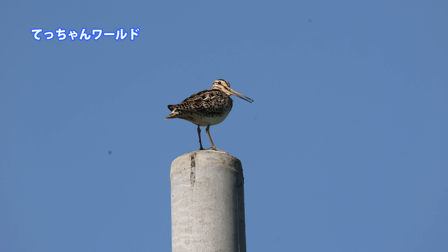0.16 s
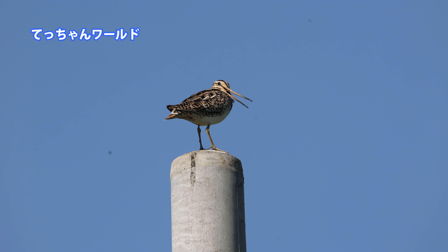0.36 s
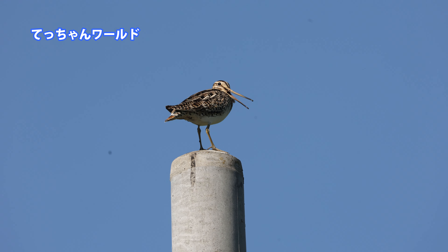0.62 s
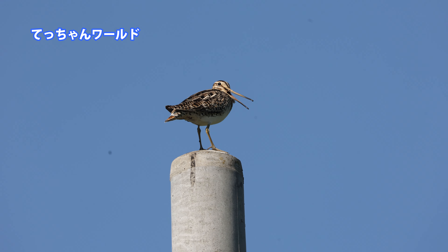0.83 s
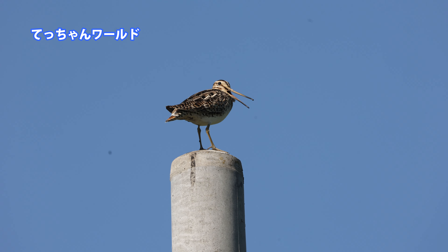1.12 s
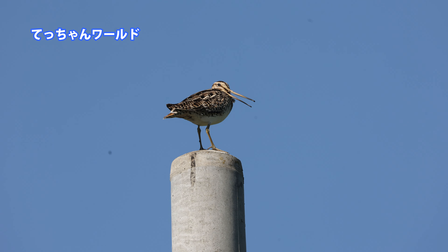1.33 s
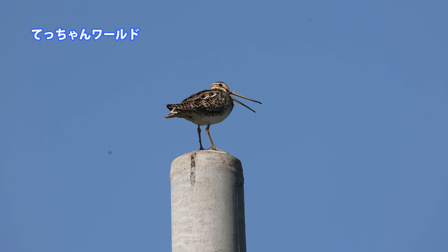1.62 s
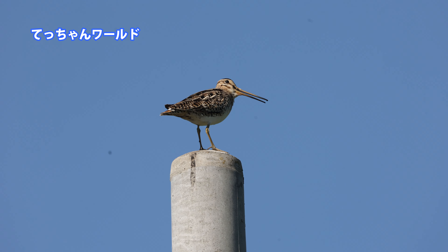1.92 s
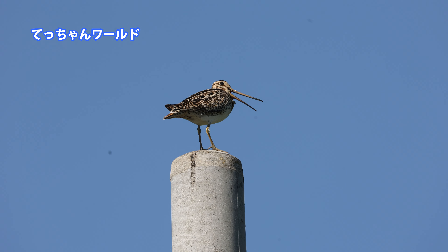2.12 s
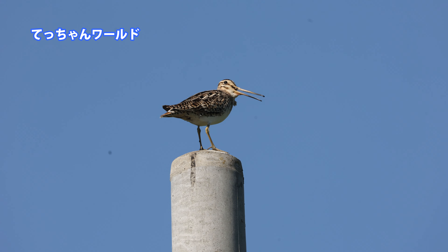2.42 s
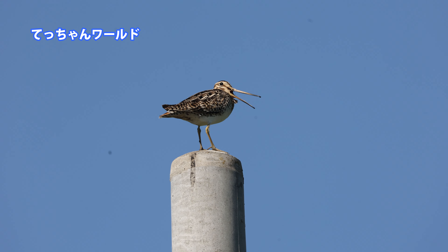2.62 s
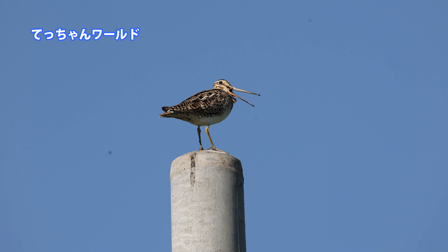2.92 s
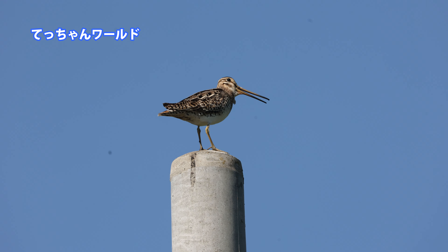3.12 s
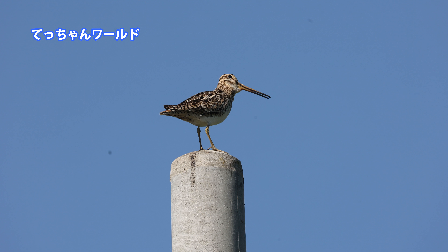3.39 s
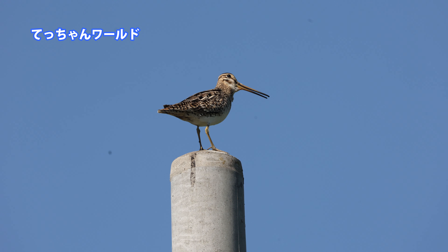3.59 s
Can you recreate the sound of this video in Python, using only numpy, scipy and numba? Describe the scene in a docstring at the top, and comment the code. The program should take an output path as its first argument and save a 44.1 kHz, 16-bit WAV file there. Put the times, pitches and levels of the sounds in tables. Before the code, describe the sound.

Rasping, scratchy snipe calls repeat outdoors, with low wind buffeting mostly in the first second or so.

```python
"""Snipe calling in wind

A snipe rasps long notes and short chips: uneven pulses ring in a throat of gliding pitch.
Close reflections and a short field echo colour the voice.
Wind thumps and rumbles at two microphone ports, mostly the right, over a faint field hiss."""
import sys
import numpy as np
from scipy import signal
from scipy.fft import rfft, irfft
from scipy.io import wavfile
from scipy.ndimage import uniform_filter1d
from numba import njit

SR = 44100
rng = np.random.default_rng(int(sys.argv[2]) if len(sys.argv) > 2 else 0)


def to_linear_factor(level_db):
    """Convert decibel levels (scalar or array-like) to linear amplitude factors."""
    exponent = np.asarray(level_db, float) / 20
    return 10 ** exponent


def dump_mix(stems):
    """Bounce the given channels to the path in sys.argv[1] as a 16-bit WAV at rate SR."""
    frames = np.atleast_2d(stems).T  # one column per channel
    limited = np.clip(frames, -1, 1)  # hard clip at full scale
    pcm = np.round(limited * 32767).astype(np.int16)
    wavfile.write(sys.argv[1], SR, pcm)


N = 165375

OPEN_HZ = 4500   # throat pitch at which ratios, widths and gains are stated
JITTER, PULSE_SPREAD_DB = 0.18, 1.8
BREATH_DB, BREATH_DB_PER_DB, BREATH_DECAY_S = -19, 0.7, 0.0012   # louder voice, more breath
SLACK_DB, SLACK_RANGE_DB = -44, 16   # pulses slow below SLACK_DB, to half rate at most
LOW_CUT_HZ = 1280
NARROWING = 0.55   # exponent: lower throat pitch, tighter ringing
UPPER_DB_PER_OCTAVE = 11.5   # per octave of throat pitch below OPEN_HZ
FILL_DB, FILL_DB_PER_OCTAVE = -54.5, 32

# single harder pulses: t/s, level/dB re usual pulse
HARD_PULSES = [(0.212, 5.5), (0.212, 7), (.470, 8.5), (0.4723, 1), (.581, 9), (1.4995, -15), (1.503, -1),
               (2.1645, 15.5), (2.1713, 6), (2.329, 7), (2.612, 21.5), (2.9681, 7), (2.969, 5), (3.611, 1)]


def snipe():
    """Uneven pulses, each with a puff of decaying noise, excite the vocal tract."""
    level_db, throat_hz, ratio, upper_db, pulse_hz, width, air_db = controls()
    effort_db = level_db - SLACK_DB
    pulse_hz = pulse_hz * np.clip(1 + effort_db / SLACK_RANGE_DB, 0.5, 1)
    wander = np.repeat(rng.standard_normal(N // 64 + 1), 64)[:N]
    cycles = np.cumsum(pulse_hz * np.exp(JITTER * wander) / SR)
    beats = np.diff(np.floor(cycles), prepend=0)
    pulses = beats * to_linear_factor(PULSE_SPREAD_DB * rng.standard_normal(N))

    decay = np.exp(-1 / (BREATH_DECAY_S * SR))
    puffs = signal.lfilter([1], [1, -decay], pulses) * rng.standard_normal(N)
    breath_db = BREATH_DB + BREATH_DB_PER_DB * np.clip(effort_db, 0, 16)
    hard = np.full(N, 1e-18)
    for t_s, hard_db in HARD_PULSES:
        hard[int(t_s * SR)] = to_linear_factor(hard_db)

    low_cut = signal.butter(2, LOW_CUT_HZ, "high", fs=SR, output="sos")
    tight = (throat_hz / OPEN_HZ) ** NARROWING
    shape = throat_hz, 1 + (ratio - 1) * tight, width * tight
    rasp = tract(signal.sosfilt(low_cut, pulses + to_linear_factor(breath_db) * puffs), *shape)
    # each layer levelled over 1800 samples (41 ms); hard pulses take the same gain
    even = 1 / np.sqrt(uniform_filter1d(rasp ** 2, size=1800, axis=1))
    throat, upper, fill, air = (rasp + tract(signal.sosfilt(low_cut, hard), *shape)) * even

    octaves = np.log2(throat_hz / OPEN_HZ)
    upper_db = upper_db - UPPER_DB_PER_OCTAVE * octaves
    fill_db = FILL_DB - FILL_DB_PER_OCTAVE * octaves
    voice = throat + to_linear_factor(fill_db) * fill - to_linear_factor(upper_db) * upper + to_linear_factor(air_db) * air
    return to_linear_factor(level_db) * voice


CHIP_RATIO, CHIP_PULSE_HZ, CHIP_WIDTH, CHIP_AIR_DB = 1.31, 370, 0.13, -27
CHIP_RELEASE_DB_PER_S = 1499.5

# long notes, one list each: t/s, level/dB, throat f/Hz
LONG_NOTES = [
    [(0.0, -41, 3550), (0.204, -36, 3620), (0.212, -31, 3900), (0.222, -36.5, 3570), (0.252, -35, 3600),
     (0.29, -62, 3530)],
    [(0.521, -46, 3840), (0.537, -39, 3880), (0.575, -61, 3760), (0.609, -45, 3870), (0.687, -36.5, 4170),
     (0.893, -33.5, 4100), (1.039, -32.5, 4210), (1.209, -31.5, 4100), (1.247, -31, 4310),
     (1.315, -26.5, 4000), (1.35, -82, 4130)],
    [(1.548, -45, 4624), (1.564, -33, 4670), (1.602, -50, 4430), (1.648, -42, 4760), (1.718, -44.5, 4530),
     (1.778, -39, 4540), (1.904, -36.5, 4340), (1.95, -30.5, 3800), (2.028, -28.5, 2560),
     (2.066, -34, 2460), (2.078, -55.5, 2640), (2.09, -68, 2497)],
    [(2.303, -72, 4825), (2.309, -33, 4500), (2.329, -26.5, 4500), (2.345, -32.5, 4422),
     (2.509, -33.5, 4460), (2.549, -30.5, 4110), (2.605, -25.5, 2550), (2.609, -29.5, 2530),
     (2.639, -28, 2387), (2.67, -93.5, 2460)],
    [(2.754, -37, 4580), (2.764, -26.5, 4330), (2.812, -28.5, 4394), (2.852, -24.5, 3466),
     (2.88, -37.5, 2900), (2.908, -43.5, 2200), (2.926, -40, 2019), (2.96, -35.5, 2300),
     (2.972, -25.5, 2380), (2.98, -29.5, 2700), (2.992, -27.5, 2870), (3.064, -31.5, 4270),
     (3.092, -32, 4266), (3.154, -27.5, 3574), (3.184, -26.5, 2300), (3.22, -34.5, 2150),
     (3.23, -71.5, 2243), (3.25, -76, 2020)],
    [(3.41, -41, 3205), (3.418, -26.5, 3391), (3.438, -27, 2690), (3.458, -35.5, 2240), (3.48, -36.5, 1995),
     (3.562, -38, 1843), (3.6, -35, 2049), (3.612, -27.5, 2137), (3.618, -31, 2290), (3.67, -31.5, 2224),
     (3.71, -73, 2192)],
]
# colour of each long note, at OPEN_HZ and before slowing: second throat peak/ratio,
# upper resonance level/dB, pulse f/Hz, throat bandwidth/share of f, airy top level/dB
LONG_NOTE_COLOURS = [(1.58, -33.5, 420, 0.15, -30), (1.46, -26.5, 520, 0.16, -37),
                     (1.204, -18, 590, 0.25, -21), (1.14, -21.5, 710, .2, -13.5),
                     (1.167, -20, 680, 0.19, -23.5), (1.086, -23, 600, 0.25, -28.5)]
# short chips: t/s, length before release/s, level/dB, throat f/Hz, upper level at OPEN_HZ/dB
SHORT_CHIPS = [(0.47, 0.003, -38, 3480, -40), (1.498, 0.0027, -30.5, 3990, -54),
               (2.166, 0.0035, -34.5, 3170, -32), (2.692, 0.0036, -27, 2710, -30.5),
               (3.279, .012, -36, 2170, -28)]


def controls():
    """Glides voice settings between points; each note or chip takes over from the last."""
    t, out = np.arange(N) / SR, np.zeros((7, N))
    parts = [(np.array(rows), colour) for rows, colour in zip(LONG_NOTES, LONG_NOTE_COLOURS)]
    release_s = 40 / CHIP_RELEASE_DB_PER_S
    for start, length, db, hz, upper_db in SHORT_CHIPS:
        end = start + length
        rows = np.array([(start, db, hz), (end, db, hz), (end + release_s, db - 40, hz)])
        parts.append((rows, (CHIP_RATIO, upper_db, CHIP_PULSE_HZ, CHIP_WIDTH, CHIP_AIR_DB)))
    for rows, colour in sorted(parts, key=lambda part: part[0][0, 0]):
        on = t >= rows[0, 0]
        out[0, on] = np.interp(t[on], rows[:, 0], rows[:, 1], right=-120)
        out[1, on] = np.interp(t[on], rows[:, 0], rows[:, 2])
        out[2:, on] = np.array(colour)[:, None]
    return out


WINDPIPE_HZ, WINDPIPE_WIDTH, WINDPIPE_GAIN = 1444, 0.04, 1.08
DIP_RATIO, DIP_WIDTH, DIP_FADE = 1.14, 0.96, 1.96   # dip fills in as throat pitch falls
UPPER_WIDTH, FILL_WIDTH = 0.54, 1.9
AIR_BAND_HZ = 8950, 13340

# upper resonance tracking the throat: throat f/Hz, upper f/Hz
UPPER_TRACK = [(1950, 4980), (2450, 5980), (3200, 7250), (4600, 10340)]


def tract(source, hz, ratio, width):
    """Windpipe peak and throat pair with a dip; upper resonance, hoarse fill, airy top apart."""
    windpipe = peak(source, WINDPIPE_HZ + 0 * hz, WINDPIPE_WIDTH)
    lifted = source + WINDPIPE_GAIN * windpipe
    throat = resonate(resonate(lifted, hz, width), hz * ratio, width)
    dip_depth = np.minimum(hz / OPEN_HZ, 1) ** DIP_FADE
    throat = throat - dip_depth * peak(throat, hz * ratio * DIP_RATIO, DIP_WIDTH)

    upper_hz = np.interp(hz, *np.transpose(UPPER_TRACK))
    upper_width = UPPER_WIDTH * (hz / OPEN_HZ) ** 2
    upper = peak(peak(source, upper_hz, upper_width), upper_hz, 2 * upper_width)
    fill = peak(source, np.sqrt(hz * upper_hz), FILL_WIDTH)
    air_band = signal.butter(1, AIR_BAND_HZ, "band", fs=SR, output="sos")
    return np.array([throat, upper, fill, signal.sosfilt(air_band, source)])


def resonate(x, hz, width):
    """Moving two-pole resonance, unity gain at DC."""
    a1, a2 = poles(hz, width)
    return biquad(x, 1 + a1 + a2, 0 * hz, 0 * hz, a1, a2)


def peak(x, hz, width):
    """Moving band-pass resonance, unity gain on top."""
    a1, a2 = poles(hz, width)
    return biquad(x, (1 - a2) / 2, 0 * hz, (a2 - 1) / 2, a1, a2)


def poles(hz, width):
    """Pole pair coefficients: bandwidth, a share of hz, sets the damping."""
    radius = np.exp(-np.pi * hz * width / SR)
    angle = 2 * np.pi * np.minimum(hz, SR / 2.2) / SR
    return -2 * radius * np.cos(angle), radius * radius


@njit
def biquad(x, b0, b1, b2, a1, a2):
    """Second-order filter with per-sample coefficients."""
    y, s1, s2 = np.zeros_like(x), 0., 0.
    for i in range(len(x)):
        y[i] = b0[i] * x[i] + s1
        s1 = b1[i] * x[i] - a1[i] * y[i] + s2
        s2 = b2[i] * x[i] - a2[i] * y[i]
    return y


FIELD_DB, FIELD_T60_S, FIELD_DELAY_S = -10, 0.18, 0.0027
ECHO_DULL_HZ, BIRD_PAN_DB = 6500, -0.55   # pan: left re right

# reflections near the microphone: delay/ms, left gain, right gain (before dulling and pan)
CLOSE_BOUNCES = [(0.41, -0.21, 0.27), (0.68, -0.35, -0.017), (0.91, -0.12, 0.055), (1.22, 0.3, 0.03),
                 (1.45, 0.14, -0.25), (2.15, -0.19, 0.18), (2.81, 0.26, 0.27), (3.2, 0.61, 0.26),
                 (3.45, 0.47, -0.34), (3.76, 0.51, 0.058), (4.06, -0.43, 0.26), (4.29, -0.29, 0.37),
                 (5.06, 0.22, -0.24), (6.44, -0.22, -0.03), (6.96, -0.2, 0.064), (7.48, 0.07, -0.043)]


def outdoors(voice):
    """Direct sound plus duller echoes: close bounces and a scattered tail of its own per port."""
    t = np.arange(SR // 3) / SR
    decay = to_linear_factor(-60 * t / FIELD_T60_S) * (t > FIELD_DELAY_S)
    reply = rng.standard_normal((2, len(t))) * decay
    reply *= to_linear_factor(FIELD_DB) / np.sqrt(np.sum(reply ** 2, axis=1, keepdims=True))
    for delay_ms, left, right in CLOSE_BOUNCES:
        reply[:, int(round(delay_ms * SR / 1000))] += left, right
    dull = signal.filtfilt(*signal.butter(1, ECHO_DULL_HZ, fs=SR), voice)
    echoes = signal.fftconvolve(dull[None], reply, axes=1)[:, :N]
    return (voice + echoes) * to_linear_factor([[BIRD_PAN_DB / 2], [-BIRD_PAN_DB / 2]])


LUMPS_PER_S, LUMP_LOW_HZ, LUMP_HIGH_HZ = 40, 70, 140
LEFT_GUST_DB = -13.5   # re right
RUMBLE_DB, RUMBLE_TOP_HZ, WIND_LOW_CUT_HZ = 7, 118, 56.5   # rumble level re lumps

# wind thumps, before core and low cut: t/s, level/dB, f/Hz, port (0 left, 1 right)
WIND_THUMPS = [(0.004, -17, 196, 1), (0.026, -17, 176, 1), (0.05, -11.5, 220, 1), (0.063, -17, 191, 0),
               (0.063, -11, 202, 1), (0.072, -18.5, 135, 1), (0.093, -16.5, 190, 1), (0.103, -12.5, 126, 0),
               (0.109, -16, 159, 1), (0.121, -8.5, 160, 0), (0.12, -4.5, 171, 1), (0.136, -12, 140, 0),
               (0.151, -13, 120, 0), (0.153, -20, 140, 1), (0.166, -26, 112, 0), (0.171, -44, 98, 1),
               (0.181, -27, 117, 1), (0.259, -28, 103, 1), (0.31, -23.5, 91, 1), (0.458, -27.5, 146.3, 1),
               (0.506, -55, 91, 1), (0.536, -23.5, 157, 1), (0.555, -5, 214, 1), (0.554, -26, 155, 0),
               (0.565, -15.5, 155, 1), (0.583, -13.5, 190, 1), (0.605, -28, 141, 0), (0.603, -7, 177, 1),
               (0.624, -17.5, 260, 1), (0.633, -22.5, 126, 0), (0.64, -11.5, 159, 1),
               (0.737, -24.5, 145, 1), (0.767, -28.5, 141, 1), (0.789, -31, 132, 1), (0.821, -29, 158, 1),
               (0.834, -19, 203, 1), (0.854, -11, 165, 1), (0.859, -26, 109, 0), (0.872, -8.5, 220, 1),
               (0.889, -12, 138, 1), (0.909, -25, 139, 1), (0.923, -20, 178, 1), (0.949, -18, 128, 1),
               (0.968, -17.5, 149, 1), (1.188, -29.5, 125, 1), (1.219, -23, 132, 1), (1.231, -33, 162, 1),
               (1.247, -17.5, 120, 1), (1.301, -25.5, 129, 1), (1.362, -24.5, 93.5, 1),
               (2.395, -26, 101, 1), (2.457, -28.5, 144, 1)]
# wind between the thumps, gain on lumps and rumble: t/s, level/dB
GUST_LEVEL = [(0.0, -37.5), (0.13, -29.5), (0.2, -46), (0.49, -47.5), (0.56, -30), (0.66, -37.5),
              (0.7, -52.5), (0.81, -38.5), (0.86, -30), (0.91, -32.5), (0.98, -34.5), (1.01, -48),
              (1.2, -42.5), (1.25, -37), (1.33, -54), (1.37, -44), (1.42, -63), (1.75, -83), (1.98, -66),
              (2.05, -45), (2.23, -70.5), (2.4, -44.5), (2.61, -52), (2.73, -82), (3.73, -80), (3.75, -82)]


def wind():
    """Strong thumps; between them lumps and low noise, random per port, follow the gust."""
    strong, small = np.zeros((2, 2, N))
    phases = rng.uniform(0, 2 * np.pi, len(WIND_THUMPS))
    for (t_s, db, hz, port), phase in zip(WIND_THUMPS, phases):
        add_thump(strong[int(round(port))], t_s, db, hz, phase)
    for port in small:
        for place, pitch, turn in rng.random((int(LUMPS_PER_S * N / SR), 3)):
            hz = LUMP_LOW_HZ + pitch * (LUMP_HIGH_HZ - LUMP_LOW_HZ)
            add_thump(port, place * N / SR, 0, hz, 2 * np.pi * turn)
    gust_db = np.interp(np.arange(N) / SR, *np.transpose(GUST_LEVEL))
    low_pass = signal.butter(4, RUMBLE_TOP_HZ, fs=SR, output="sos")
    rumble = rms_one(signal.sosfilt(low_pass, rng.standard_normal((2, N))))
    between = rms_one(small) + to_linear_factor(RUMBLE_DB) * rumble
    both = strong + between * to_linear_factor(gust_db + np.array([[LEFT_GUST_DB], [0]]))
    low_cut = signal.butter(3, WIND_LOW_CUT_HZ, "high", fs=SR, output="sos")
    return signal.sosfilt(low_cut, both)


THUMP_CYCLES = 0.35   # bell deviation
CORE_SHARE, CORE_DB = 0.49, -12.5   # core duration and level re swing


def add_thump(out, t_s, db, hz, phase):
    """A pressure swing under a bell-shaped envelope, with a shorter, faster core."""
    i = np.arange(max(int((t_s - 0.04) * SR), 0), min(int((t_s + 0.04) * SR), N))
    cycles = (i / SR - t_s) * hz
    for share, part_db in ((1, db), (CORE_SHARE, db + CORE_DB)):
        turns = cycles / share
        bell = np.exp(-0.5 * (turns / THUMP_CYCLES) ** 2)
        out[i] += to_linear_factor(part_db) * bell * np.cos(2 * np.pi * turns + phase)


def rms_one(x):
    """Scales to unit rms over all channels."""
    return x / np.sqrt(np.mean(x ** 2) + 1e-20)


AMBIENCE_RMS_DB, AMBIENCE_ALIKE = -56, 0.28   # alike: correlation between ports

# hiss spectrum, relative: f/Hz, level/dB
HISS_SPECTRUM = [(120, -3), (200, -3.5), (485, -3), (570, -0.5), (708, -1.5), (880, -4.5), (1510, -8),
                 (6770, -19.5), (12700, -30.5), (15000, -60)]


def ambience():
    """Far hiss of the open field: shaped noise, partly alike at both ports."""
    hz, db = np.transpose(HISS_SPECTRUM)
    bins_hz = np.fft.rfftfreq(N, 1 / SR)
    shape = to_linear_factor(np.interp(np.log(bins_hz + 1), np.log(hz), db))
    mid, side = irfft(rfft(rng.standard_normal((2, N))) * shape, N)
    common = np.sqrt(1 + AMBIENCE_ALIKE) * mid
    apart = np.sqrt(1 - AMBIENCE_ALIKE) * side * [[1], [-1]]
    return to_linear_factor(AMBIENCE_RMS_DB) * rms_one(common + apart)


def scene():
    """Snipe in the field, wind at the ports, hiss behind."""
    return outdoors(snipe()) + wind() + ambience()


def band_limit(x):
    """A steep low-pass at the top of the band."""
    return signal.sosfilt(signal.butter(12, 15320, fs=SR, output="sos"), x)


MIC_DIP_HZ, MIC_DIP_Q, TOP_CUT_HZ = 12030, 18, 14300


def record(dry):
    """Microphone with a narrow dip in the high treble, then a steep top cut."""
    dip = signal.lfilter(*signal.iirpeak(MIC_DIP_HZ, MIC_DIP_Q, fs=SR), dry)
    top_cut = signal.ellip(12, 1, 45, TOP_CUT_HZ, fs=SR, output="sos")
    mix = signal.sosfilt(top_cut, dry - dip)
    return band_limit(mix)


dry = scene()
out = record(dry)
dump_mix(out)
```